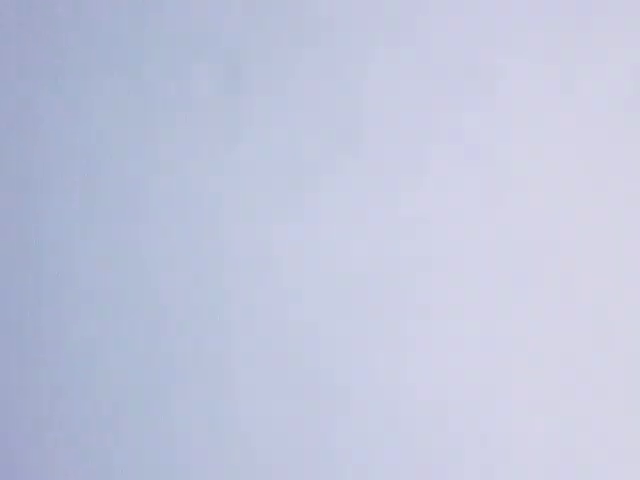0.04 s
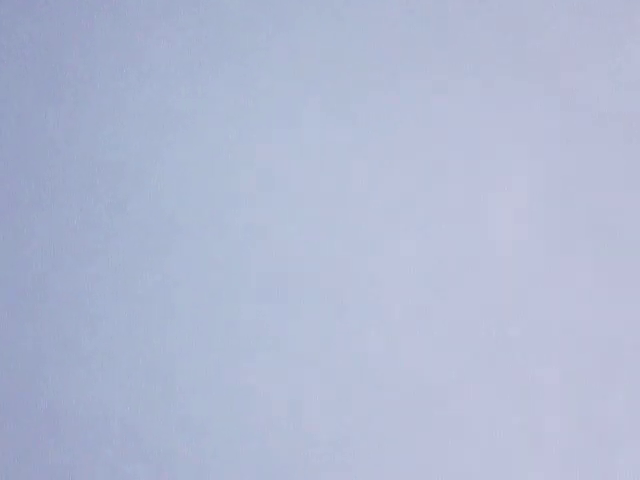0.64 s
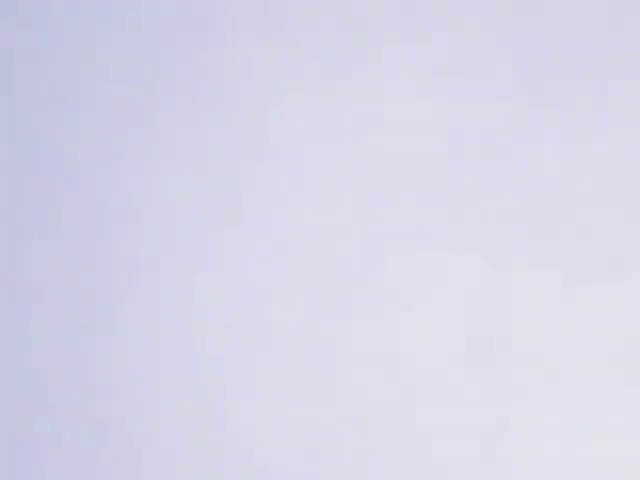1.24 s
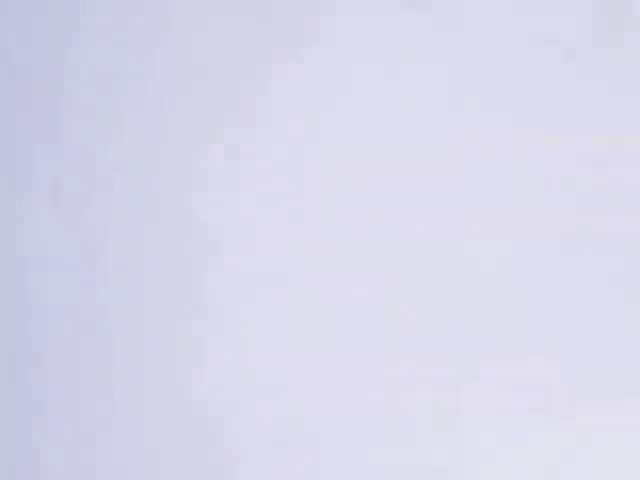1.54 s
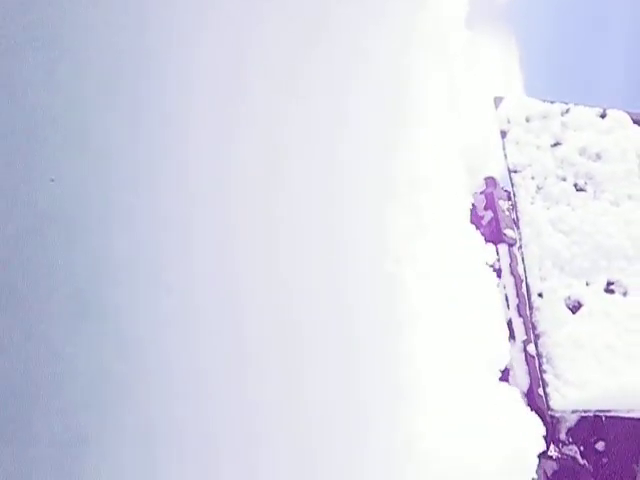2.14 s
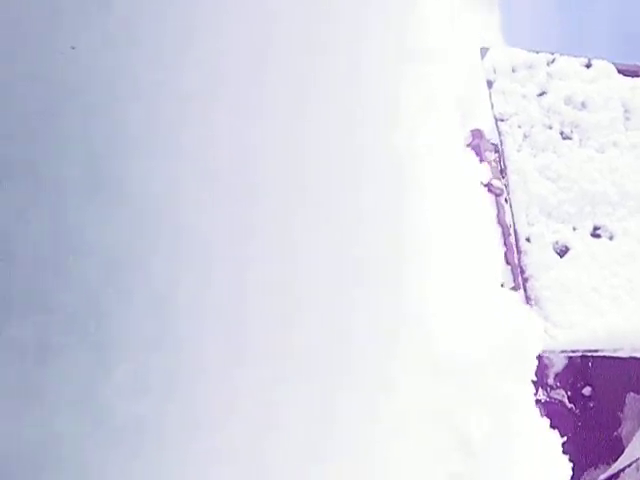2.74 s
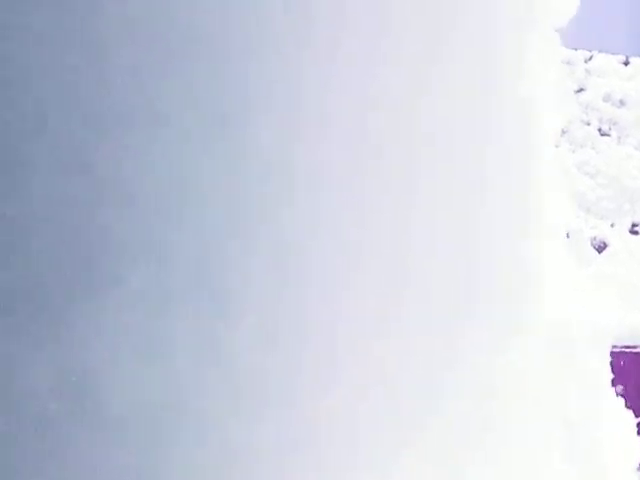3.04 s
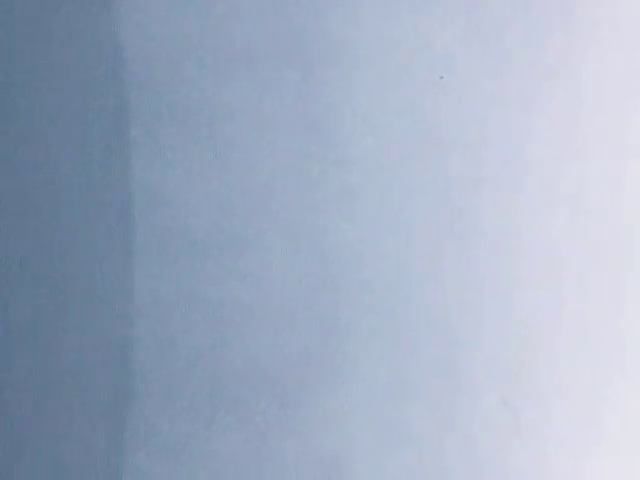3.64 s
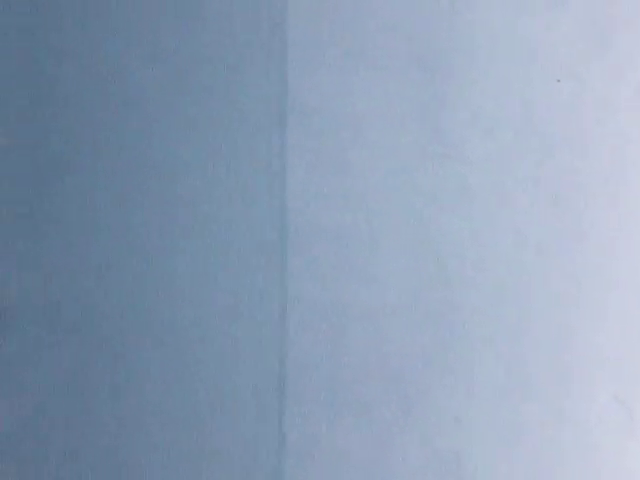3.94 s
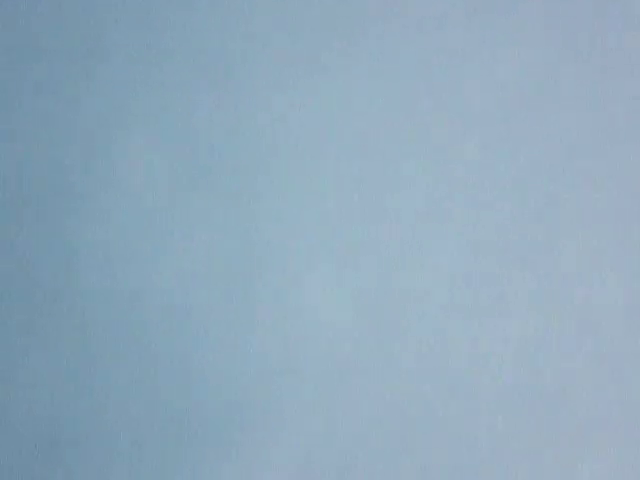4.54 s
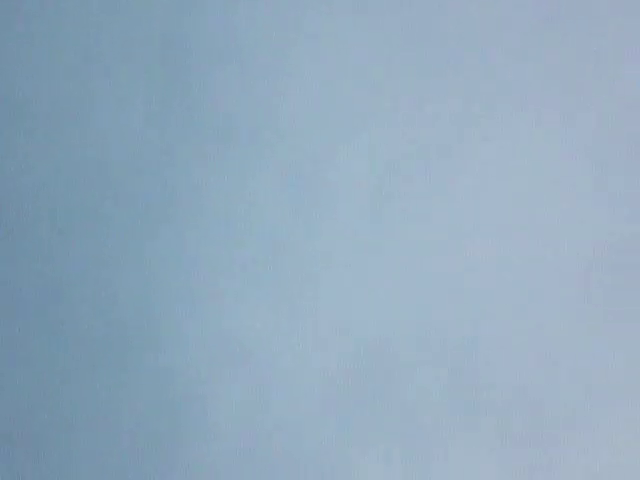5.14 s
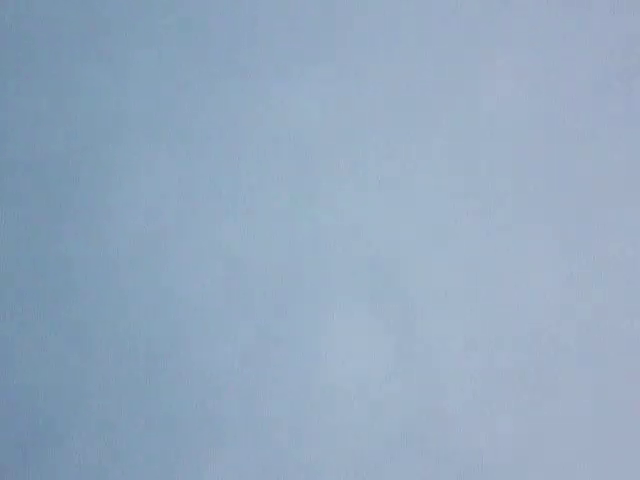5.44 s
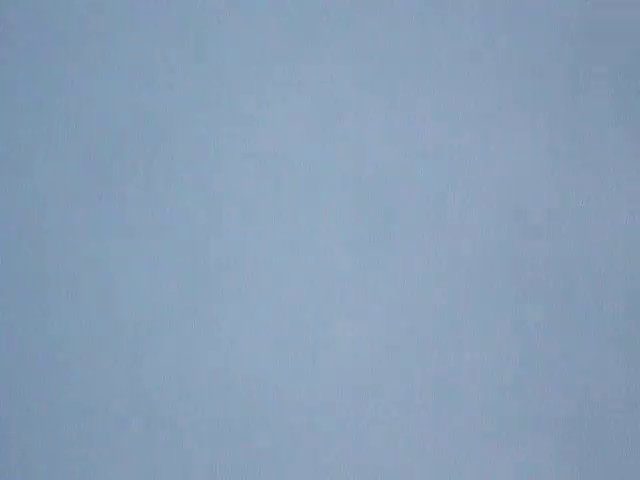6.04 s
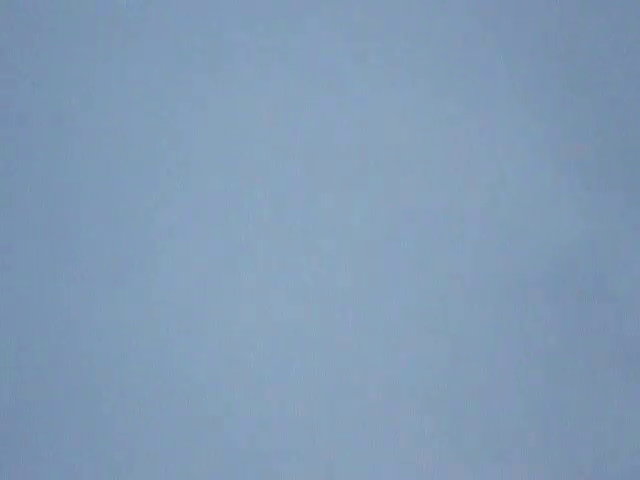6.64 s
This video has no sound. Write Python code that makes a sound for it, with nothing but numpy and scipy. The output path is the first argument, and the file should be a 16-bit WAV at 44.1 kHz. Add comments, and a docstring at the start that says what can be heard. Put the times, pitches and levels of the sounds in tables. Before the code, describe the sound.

Close plastic knocks and frosty scrapes over a hollow hiss, then slush fizzes, air gurgles and water closes over with dull bubbling.

```python
"""A camera in a case is lowered on a line down a hole in lake ice, heard through its own microphone.
At first air hisses and the hole drones while the case knocks on the wall and scrapes down the frost.
Each hard knock overloads the recorder, which turns itself down for a moment, so the hiss dips too.
After about 4 seconds the case breaks through fizzing slush, and trapped air gurgles out.
Then water closes over it and shuts out the air, and it sinks among glugging bubbles."""
import sys
import numpy as np
from scipy import signal
from scipy.fft import rfft, irfft, next_fast_len
from scipy.io import wavfile
from scipy.ndimage import uniform_filter1d, minimum_filter1d

SR = 44100
rng = np.random.default_rng(int(sys.argv[2]) if len(sys.argv) > 2 else 0)


def bounce(signal):
    """Save signal as a 16-bit WAV file at the path given by the first command-line argument."""
    frames = np.transpose(np.atleast_2d(signal))
    limited = np.clip(frames, -1, 1)
    pcm = np.round(limited * 32767).astype(np.int16)
    wavfile.write(sys.argv[1], SR, pcm)


N = 298998
TIME = np.arange(N) / SR
WATER_CLOSES_S = 4.65


def from_db(db):
    """Turn decibels into a number to multiply a sound by."""
    return 10 ** (np.asarray(db) / 20)


def rms_one(x):
    """Scale a sound so that its average strength (rms) is 1."""
    return x / np.sqrt(np.mean(x ** 2) + 1e-20)


def curve(rows):
    """Join (seconds, value) points with straight lines, giving one value per sample."""
    return np.interp(TIME, *np.transpose(rows))


def add(out, s, sound):
    """Mix a sound in, starting at s seconds."""
    at = max(0, int(s * SR))
    out[at:at + len(sound)] += sound[:max(0, N - at)]


def colour(x, tone):
    """Make some pitches stronger than others, following (Hz, dB) rows; the result has strength 1."""
    hz, db = np.transpose(tone)
    size = next_fast_len(N)
    bin_hz = np.maximum(np.fft.rfftfreq(size, 1 / SR), 1)
    gain = from_db(np.interp(np.log(bin_hz), np.log(hz), db))
    return rms_one(irfft(rfft(x, size) * gain, size)[:N])


def noise():
    """White noise: an even hiss."""
    return rng.standard_normal(N)


def grains(per_s, spread_db):
    """Tiny clicks at random moments; more spread makes their sizes more uneven."""
    clicks = (rng.random(N) < per_s / SR) * noise()
    return rms_one(clicks * from_db(spread_db * np.minimum(rng.exponential(1, N), 4)))


def waver(depth_db=1.76, steps_per_s=8):
    """A volume that wanders slowly by chance."""
    steps = rng.standard_normal(int(N / SR * 40))
    return from_db(depth_db * np.interp(TIME * steps_per_s, np.arange(len(steps)), steps))


def resonate(x, hz, width_hz):
    """Make a sound ring at one pitch; a smaller width rings longer."""
    r = np.exp(-np.pi * width_hz / SR)
    feedback = [1, -2 * r * np.cos(2 * np.pi * hz / SR), r * r]
    return signal.lfilter(np.array([1, 0, -1]) * (1 - r * r) / 2, feedback, x)


def case_ring(x, share, decay_s=0.004):
    """The plastic case rings at many close, high pitches, which smears each click a little."""
    t = TIME[:SR // 30]
    tail = np.diff(rng.standard_normal(len(t) + 1)) * np.exp(-t / decay_s)
    tail = signal.lfilter(*signal.butter(1, 2500, fs=SR), tail)
    ringing = signal.fftconvolve(x, tail / np.linalg.norm(tail))[:N]
    return (x + share * ringing) / np.hypot(1, share)


def burst(t, length_s, rise_s, fall_s):
    """A volume shape that comes on, holds until length_s, then dies away."""
    return (1 - np.exp(-t / rise_s)) * np.exp(-np.maximum(t - length_s, 0) / fall_s)


# How loudly air hisses on the case. Each row: time in seconds, level in dB.
HISS_LEVEL = [(0, -31.5), (.2, -31.5), (.55, -40), (1, -41.5), (1.45, -39.5), (1.65, -50.5), (2.05, -44),
              (2.4, -51.5), (3.4, -48), (4, -39), (4.5, -42.5), (4.62, -38)]
# The notes of the hollow hole and case. Each row: pitch in Hz, width in Hz, relative level in dB.
HOLLOW_NOTES = [(288, 27.6, 4.5), (825, 33, -6), (1240, 114, -14), (1454, 13, -16.5), (2130, 9, -11),
                (3550, 66, -29.5), (4190, 29, -41.5)]
# The tone of the hiss and of the swaying line. Each row: pitch in Hz, relative level in dB.
HISS_TONE = [(300, -4), (600, 3.5), (1000, -2), (1400, -1), (2000, 3), (2700, -3), (4500, -1.5), (5400, -2),
             (6700, 3), (8500, -3.5), (11500, -5.5), (14000, 0), (16000, -9.5)]
SWAY_TONE = [(20, -46), (35, -28.5), (55, 4), (100, 0.5), (170, -2.5), (300, -11), (700, -59)]


def air(drone_db=-36, drone_follows_hiss=0.36, sway_db=-40.5):
    """Moving air makes the hole drone and the case hiss; the swaying line rumbles. Water ends it all."""
    hiss_db = curve(HISS_LEVEL)
    drone_gain = from_db(drone_db + drone_follows_hiss * (hiss_db - hiss_db.mean())) * waver()
    draught = noise()
    drone = rms_one(sum(from_db(db) * resonate(draught, hz, width) for hz, width, db in HOLLOW_NOTES))
    hiss = from_db(hiss_db) * case_ring(colour(noise(), HISS_TONE), share=0.37)
    sway = from_db(sway_db) * waver() * colour(noise(), SWAY_TONE)
    in_air = np.exp(-np.maximum(TIME - WATER_CLOSES_S, 0) / 0.012)
    return in_air * (drone_gain * drone + hiss + sway)


# Water flowing past, with a surge as the case goes under. Each row: time in seconds, level in dB.
FLOW_LEVEL = [(4.62, -27), (4.73, -13), (4.88, -25), (5.2, -34), (5.44, -27.5), (5.66, -28), (5.95, -35),
              (6.4, -35), (6.78, -34)]
# Rumble and fine bubbles dip, then grow as the case sinks deeper.
# Each row: time in seconds, rumble in dB, fine bubbles in dB, both compared with the flow.
SINKING_LEVELS = [(4.75, -13, -10), (5.1, -21.5, -21.5), (5.8, -2.5, -10), (6.78, 5, -7.5)]
# The tone of the churning, the fine bubbles and the rumble. Each row: pitch in Hz, relative level in dB.
CHURN_TONE = [(25, -59.5), (50, -39), (120, -33.5), (280, -2.5), (600, 2.5), (850, -3), (1200, -9),
              (1700, -16.5), (2400, -14), (3500, -27.5), (7000, -44)]
FINE_BUBBLE_TONE = [(1000, 14), (2300, -6), (3300, -5), (5000, -6.5), (7000, -26), (10000, -46.5)]
RUMBLE_TONE = [(25, -48), (60, -14), (95, -7), (150, 5), (230, 8.5), (400, 5.5), (900, -39)]


def water():
    """Under water, crowds of small bubbles churn and tick over a low rumble, all driven by the flow."""
    silent_before, silent_after = (FLOW_LEVEL[0][0] - 0.05, -100), (FLOW_LEVEL[-1][0] + 0.049, -100)
    flow = from_db(curve([silent_before, *FLOW_LEVEL, silent_after]))
    s, *levels_db = np.transpose(SINKING_LEVELS)
    rumble_gain, fine_gain = [from_db(np.interp(TIME, s, db)) for db in levels_db]
    crowd = sum(resonate(grains(110, spread_db=2.5), hz, hz / 7) / np.sqrt(hz)
                for hz in np.geomspace(220, 3200, 18))
    churn = colour(rms_one(crowd) + 1.27 * noise(), CHURN_TONE)
    # Now and then a lone small bubble rings out of the crowd.
    blips = sum(resonate(resonate(grains(5, spread_db=1.5), hz, hz / 12), hz, hz / 2) / hz
                for hz in np.geomspace(950, 2000, 10))
    ticks = colour(noise() + 0.9 * grains(35, spread_db=1.5), FINE_BUBBLE_TONE)
    fine_bubbles = fine_gain * (ticks + from_db(-3.5) * rms_one(blips))
    rumble = rumble_gain * waver() * colour(noise(), RUMBLE_TONE)
    return flow * (churn + fine_bubbles + rumble)


def stray_bubbles(per_s=11, middle_db=-20.5, spread_db=5, low_hz=260, high_hz=860):
    """Make rows like those of BIG_BUBBLES for weaker bubbles that come at random under water."""
    delay, size, pitch = rng.random((60, 3)).T
    s = WATER_CLOSES_S + (np.arange(len(delay)) + delay) / per_s
    db = middle_db + spread_db * (2 * size - 1)
    hz = low_hz * (high_hz / low_hz) ** pitch
    return np.transpose([s, db, hz]).tolist()


# The loudest bubbles against the case. Each row: start in seconds, relative level in dB, pitch in Hz.
BIG_BUBBLES = [(4.177, -0.5, 320), (4.191, 1.5, 279), (4.208, -3.5, 323), (4.263, -2.5, 300),
               (4.294, 0, 285), (4.34, 1, 288), (4.362, 0.5, 286), (4.373, -1, 286), (4.386, -2, 363),
               (4.459, 4, 266), (4.634, 4.5, 1250), (4.6555, 3, 1060), (4.669, 8.5, 1160),
               (4.684, 10.5, 900), (4.8124, 4.5, 750), (4.8325, 5.5, 630), (4.9276, 0, 530),
               (4.945, -3, 580), (4.954, -2, 680), (4.978, -2.5, 655), (4.986, -2, 503), (5.023, -1.5, 594),
               (5.036, -10, 417), (5.059, -7.5, 281), (5.095, -11, 740), (5.2995, -10.5, 660),
               (5.438, -8, 960), (5.61, -14, 574), (6.0283, -10, 846), (6.153, -13, 1100),
               (6.201, -14.5, 213), (6.319, -13.5, 570), (6.451, -13.5, 390), (6.516, -8.5, 298),
               (6.75, -9, 657)]
# The tone of a bubble's pop. Each row: pitch in Hz, relative level in dB.
POP_TONE = [(120, -55), (220, -0.5), (400, 2), (700, 6.5), (1000, 4), (1400, -19.5), (2300, -48),
            (4000, -32), (9000, -77)]


def bubbles(rebound_s=0.0085, rebound_db=-14, under_water_s=4.55, glide=0.0047):
    """Each air pocket pops, rings briefly with a rising pitch, then rebounds once, more weakly."""
    rings, pops = np.zeros((2, N))
    t = TIME[:SR // 16]
    rows = list(BIG_BUBBLES) + stray_bubbles()
    rows += [(s + rebound_s, db + rebound_db, hz) for s, db, hz in rows]
    for s, db, hz in rows:
        # Under water the pockets break into several sizes, so the pop and extra notes are stronger.
        spatter = 1 if s > under_water_s else from_db(-13)
        higher = 1.61 + 0.35 * rng.uniform(-1, 1)
        lower = 0.49 + 0.12 * rng.uniform(-1, 1)
        for ratio, gain in [(1, 1), (higher, spatter * from_db(-8)), (lower, spatter * from_db(-9))]:
            cycles = hz * ratio * t
            note = np.sin(2 * np.pi * cycles * (1 + glide * np.minimum(cycles, 8)))
            swell = burst(t * ratio, 1 / hz, rise_s=0.5 / hz, fall_s=1 / hz)
            add(rings, s, gain * from_db(db - 2.5) * swell * note)
        add(pops, s, spatter * from_db(db - 10) * burst(t, 0.0012, rise_s=0.00025, fall_s=0.002))
    # Small pockets give no deep bass, and water dulls their highest pitches.
    band = signal.butter(3, [145, 3800], "band", fs=SR, output="sos")
    return signal.sosfilt(band, rings + pops * colour(noise(), POP_TONE))


def gurgles(start_s=4.18, length_s=0.19, level_db=-20, hz=286, width_hz=130):
    """Trapped air escapes from under the case in small, uneven gulps that keep an air pocket ringing."""
    swell = burst(np.maximum(TIME - start_s, 0), length_s, rise_s=0.0071, fall_s=0.13)
    gulps = grains(600, spread_db=1.2)
    pocket = resonate(resonate(gulps, hz, width_hz), hz, 2 * width_hz)
    return from_db(level_db) * swell * rms_one(pocket)


# The tone of the crackles and snaps in slush. Each row: pitch in Hz, relative level in dB.
CRACKLE_TONE = [(300, -15), (800, -6.5), (1500, -6), (2500, -7.5), (5000, -3.5), (7000, -22.5),
                (10000, -15), (15000, -30)]


def fizzing(centre_hz, width_octaves=0.34):
    """Tiny bubbles burst around a moving pitch, over a thin crackle and a few snapping crystals."""
    swarm = 0
    for hz in np.geomspace(600, 5400, 12):
        closeness = np.exp(-0.5 * (np.log2(hz / centre_hz) / width_octaves) ** 2)
        pops = grains(2500, spread_db=7.5)
        swarm += closeness * rms_one(resonate(resonate(pops, hz, hz / 3), hz, hz / 2))
    crackle = colour(grains(7800, spread_db=5.5), CRACKLE_TONE)
    snaps = colour(grains(91, spread_db=2.5), CRACKLE_TONE)
    snaps = rms_one(case_ring(snaps, share=1.7, decay_s=0.0012))
    return from_db(-9.5) * swarm + from_db(-9) * (crackle + snaps)


# Slush parting around the case. Each row: start in seconds, length in seconds,
# relative level in dB, starting pitch in Hz, ending pitch in Hz.
SLUSH_BURSTS = [(4.073, .118, -17, 3000, 4600), (4.193, 0.44, -30, 2500, 1900),
                (4.612, 0.068, -26, 1800, 1300)]


def slush(fade_db_per_s=17):
    """Slush fizzes in fading bursts of gliding pitch as the case breaks in."""
    loudness, pitch_points = np.zeros(N), []
    t = TIME[:SR]
    for s, length, db, start_hz, end_hz in SLUSH_BURSTS:
        swell = burst(t, length, rise_s=0.0019, fall_s=0.0069)
        add(loudness, s, from_db(db - fade_db_per_s * t) * swell)
        pitch_points += [(s, start_hz), (s + length, end_hz)]
    return loudness * fizzing(curve(sorted(pitch_points)))


# Slides along the wall. Each row: start in seconds, length in seconds, pressure in dB.
SLIDES = [(0.833, 0.029, -23), (0.88, 0.049, -28), (1.76, 0.0061, -28), (1.841, .035, -30.5),
          (1.908, 0.021, -31), (1.957, 0.026, -31.5), (2.174, 0.014, -21.5), (2.392, 0.25, -38.5),
          (2.595, .026, -29), (2.662, 0.06, -26), (2.753, 0.028, -28.5), (2.82, .012, -16),
          (2.852, 0.047, -27.5), (2.947, 0.035, -30), (3.058, 0.12, -24), (3.208, 0.056, -24),
          (3.286, 0.066, -29), (3.458, 0.021, -20), (3.508, 0.057, -21), (3.579, .025, -29),
          (3.65, 0.028, -18.5), (3.69, 0.067, -24.5), (3.795, 0.04, -27), (3.865, .081, -32.5),
          (3.961, 0.198, -29.5)]
# Frost on the wall: thick at the rim, then bare ice, then a thin coat.
# Each row: time in seconds, level of the gritty sound in dB compared with the pressure.
FROST_LEVEL = [(.9, 12), (1.8, -35), (2.2, -42), (2.4, -12.5), (2.8, -8.5), (3.3, -14), (4.1, -7)]
# The tone of the rubbing case and of the gritty frost. Each row: pitch in Hz, relative level in dB.
RUB_TONE = [(30, -70), (60, -2.5), (150, 7), (215, -1.5), (350, 6.5), (600, 2), (850, -1), (1050, -9.5),
            (1300, -4.5), (1700, -37), (3000, -42.5), (6000, -52), (12000, -71)]
GRIT_TONE = [(200, -39), (800, -11), (2000, -9), (3200, -7.5), (5200, -5.5), (6700, 6), (8500, -6.5),
             (11500, -5.5), (13500, 7), (15000, 3), (16500, -29)]


def slides(drag_db=-25, drag_follows_thump=0.64):
    """The case sticks and slips over frost: jolts shake its body and crystals snap."""
    pressure, drag = np.zeros((2, N))
    t = TIME[:SR // 3]
    bite = 1 + from_db(-2) * np.exp(-t / 0.01)   # an extra push as the case breaks loose
    for s, length, db in SLIDES:
        add(pressure, s, from_db(db) * bite * burst(t, length, rise_s=0.0014, fall_s=0.013))
    # After each of the KNOCKS below, the case drags for a moment, harder after a hard one.
    brief_drag = burst(t, 0.0047, rise_s=0.0075, fall_s=0.022)
    for s, thump_db, *_ in KNOCKS:
        add(drag, s, from_db(drag_db + drag_follows_thump * thump_db) * brief_drag)
    jolts_db = 3.1 * colour(noise(), [(10, 19), (60, 9), (200, -2.0), (600, -28.5), (3000, -88)])
    crystals = case_ring(colour(grains(3500, spread_db=0), GRIT_TONE), share=0.81)
    grit = pressure * from_db(curve(FROST_LEVEL)) * crystals
    rub = np.hypot(pressure, drag) * colour(grains(1500, spread_db=0.5), RUB_TONE)
    return rms_one(from_db(jolts_db)) * (rub + grit)


# The case hitting the wall. Each row: start in seconds, thump level in dB, thump pitch in Hz,
# frost crunch level in dB, length of the touch in seconds.
KNOCKS = [(.075, 13, 210, 5.5, 0.0025), (0.551, -1.5, 159, 0.5, 0.0036), (0.8232, -14.5, 145, -1.5, 0.0091),
          (0.897, -10, 167, -7.5, 0.0077), (1.4627, -1.5, 137, -3, 0.0081),
          (1.678, -12.5, 109, -57, 0.0088), (2.0829, 16.5, 295, -1.5, 0.0035),
          (2.24, 13, 198.3, -24.5, 0.0077), (2.28, -5, 146, -24.5, 0.0047), (2.621, -15, 109, -40, .0025),
          (2.671, -6.5, 121, -24, 0.0085), (2.7116, -11, 148, -43, 0.0048), (2.86, -9.5, 267, -17, 0.0039),
          (3.062, -11.5, 160, -30, .004), (3.174, -9.5, 140, -50, .0025), (3.311, -6.5, 365, -34, 0.0034),
          (3.357, -3, 350, -56, 0.0019), (3.669, -4, 300, -21.5, 0.0052), (4.4575, 4.5, 311, -22.5, .003),
          (4.633, 6.5, 700, -20, .0027), (4.6684, 5.5, 700, -22, 0.0041)]
# The tone of the case's clack, the frost's crunch and the hole's echo.
# Each row: pitch in Hz, relative level in dB.
CLACK_TONE = [(150, -21.5), (400, 14), (850, 12.5), (1100, 14), (1450, 11.5), (1750, 6.5), (2300, -6),
              (4000, -5.5), (9000, -17)]
CRUNCH_TONE = [(500, -4), (1400, -5.5), (2300, -4.5), (3500, -14), (6500, -1), (9000, -8), (13500, -8),
               (16500, 1.5)]
ECHO_TONE = [(100, -8.5), (250, 19), (500, -16), (1500, -2), (2300, -9.5), (4500, -11.5), (7000, -22.5),
             (14000, -32)]


def knocks(ping_hz=8970, clack_frost_share=0.38):
    """Each knock crushes frost while the case thumps, clacks and pings; the hole rings on briefly."""
    thumps, clack, crunch, echo = np.zeros((4, N))
    t = TIME[:SR // 8]
    ping = from_db(-46.5) * np.sin(2 * np.pi * ping_hz * t) * np.exp(-t / 0.008)
    rattle = from_db(-25) * np.exp(-t / 0.012)
    for s, thump_db, hz, crunch_db, length in KNOCKS:
        thump = np.sin(2 * np.pi * hz * t) * burst(t, 0.57 / hz, rise_s=0.46 / hz, fall_s=0.39 / hz)
        crush = burst(t, length, rise_s=0.0007, fall_s=0.00085) + rattle
        clack_db = thump_db - 8 + clack_frost_share * (crunch_db - thump_db)
        add(thumps, s, from_db(thump_db) * (ping - thump))
        add(clack, s, from_db(clack_db) * crush)
        add(crunch, s, from_db(crunch_db) * crush)
        add(echo, s, from_db(crunch_db - 17) * burst(t, 0.019, rise_s=0.0044, fall_s=0.0083))
    frost = crunch * colour(grains(30000, spread_db=2), CRUNCH_TONE)
    return thumps + clack * colour(noise(), CLACK_TONE) + frost + echo * colour(noise(), ECHO_TONE)


def scene(microphone_hiss_db=-63.5):
    """Everything reaches one microphone inside the case, which adds a faint hiss of its own."""
    sources = knocks() + slides() + air() + slush() + gurgles() + bubbles() + water()
    return (sources + from_db(microphone_hiss_db) * noise())[None]


def gain_control(x, threshold_db=-9.5, hold_s=0.063, release_db_per_s=115, attack_s=0.0093):
    """Loud sound makes the recorder turn itself down, wait a moment, then come back up."""
    level_db = 10 * np.log10(np.maximum(uniform_filter1d(x ** 2, size=200, origin=99), 1e-12))
    wanted_db = -1.4 * np.maximum(level_db - threshold_db, 0)
    hold = int(hold_s * SR) // 2 * 2 + 1
    held_cut_db = -minimum_filter1d(wanted_db, hold, origin=hold // 2)
    recovery_db = release_db_per_s * TIME
    cut_db = np.maximum.accumulate(held_cut_db + recovery_db) - recovery_db
    smoothing = np.exp(-1 / (attack_s * SR))
    return x * from_db(-signal.lfilter([1 - smoothing], [1, -smoothing], cut_db))


def record(dry, lowest_hz=42, highest_hz=15800):
    """The recorder trims the bass, turns loud moments down, flattens peaks and cuts the very top."""
    x = signal.sosfilt(signal.butter(4, lowest_hz, "high", fs=SR, output="sos"), dry[0])
    x = gain_control(x)
    x = x - 0.92 * resonate(x, hz=7900, width_hz=450)   # the microphone barely hears this narrow band
    x = np.clip(x, -0.7, 0.7)   # overload
    return signal.sosfiltfilt(signal.ellip(8, 0.1, 50, highest_hz, fs=SR, output="sos"), x)[None]


dry = scene()
out = record(dry)
bounce(out)
```